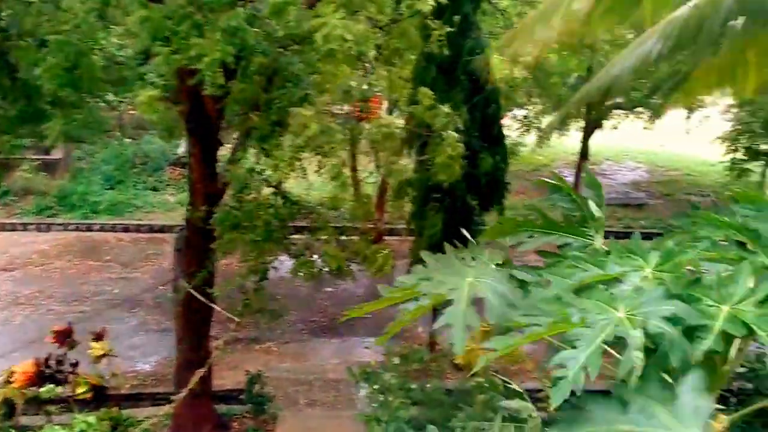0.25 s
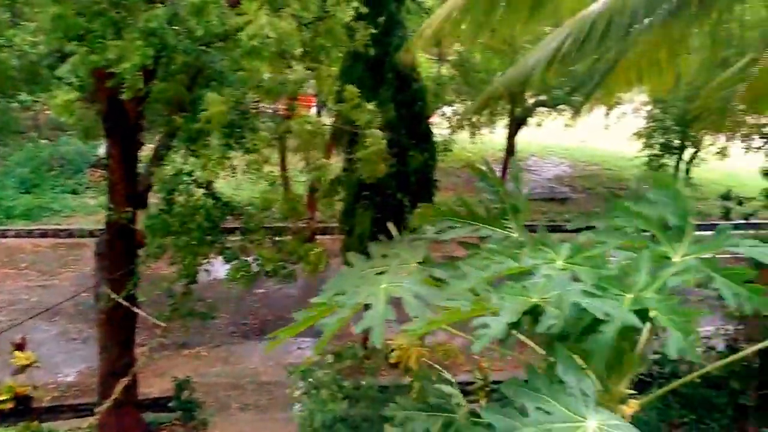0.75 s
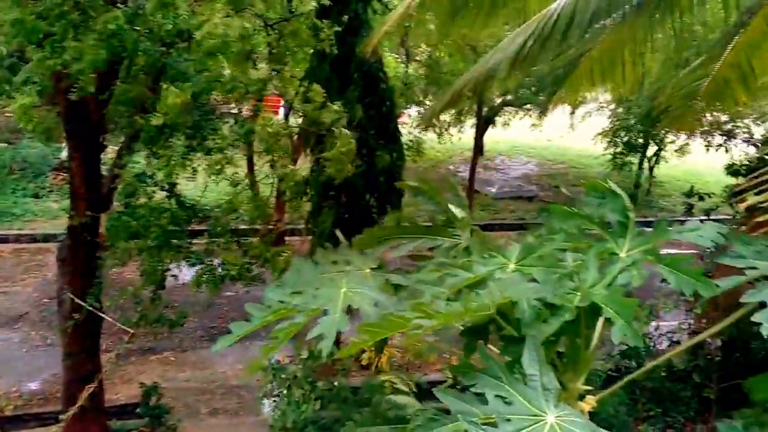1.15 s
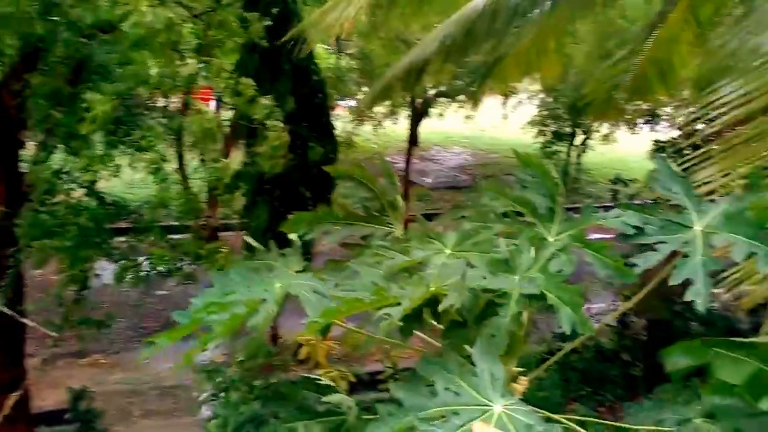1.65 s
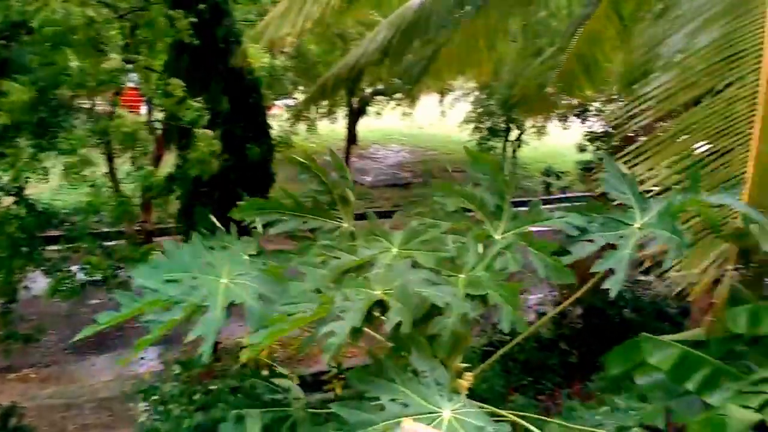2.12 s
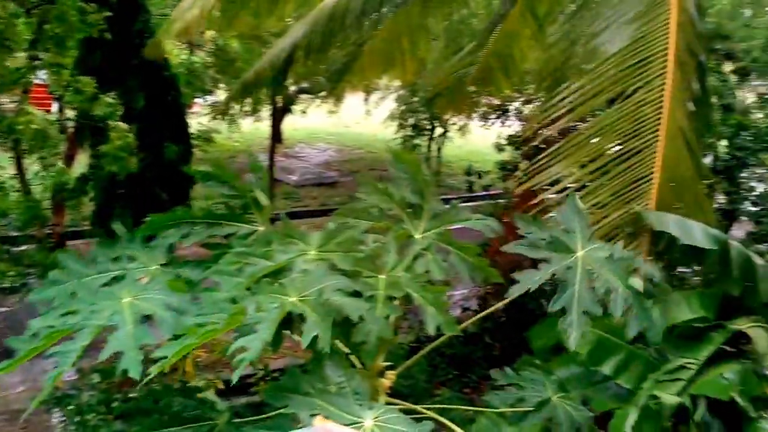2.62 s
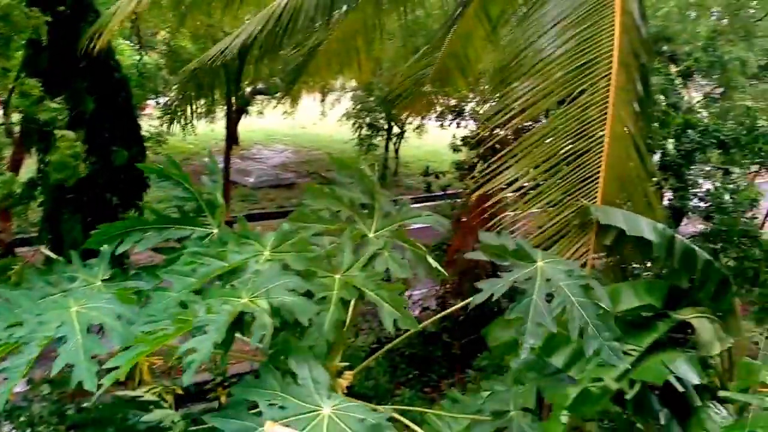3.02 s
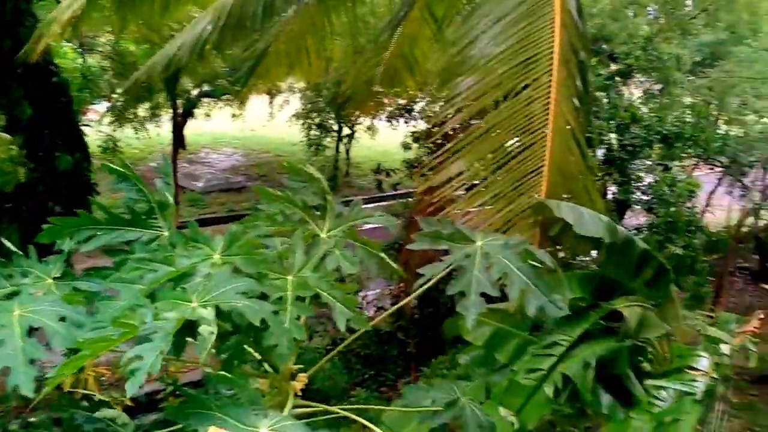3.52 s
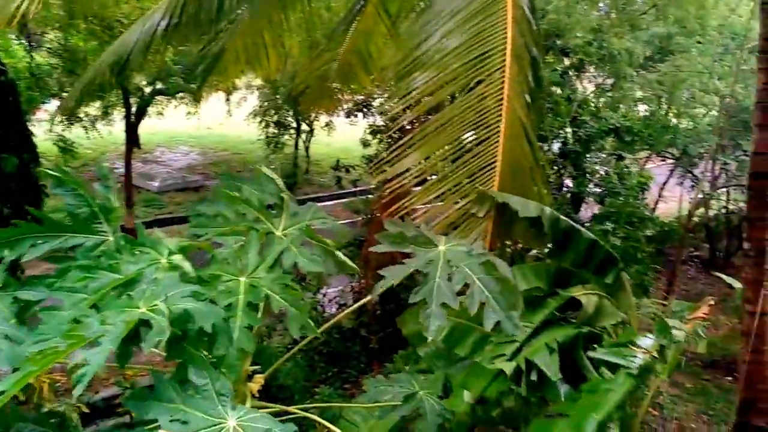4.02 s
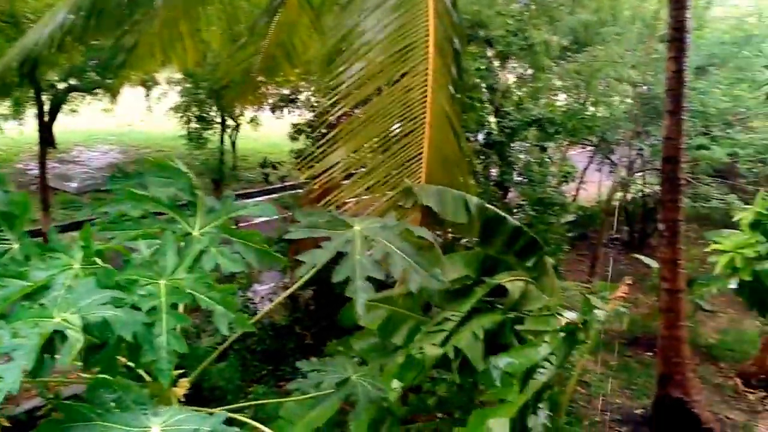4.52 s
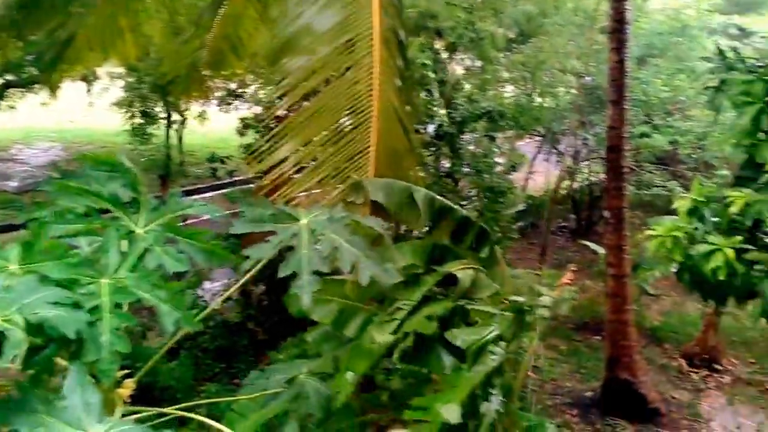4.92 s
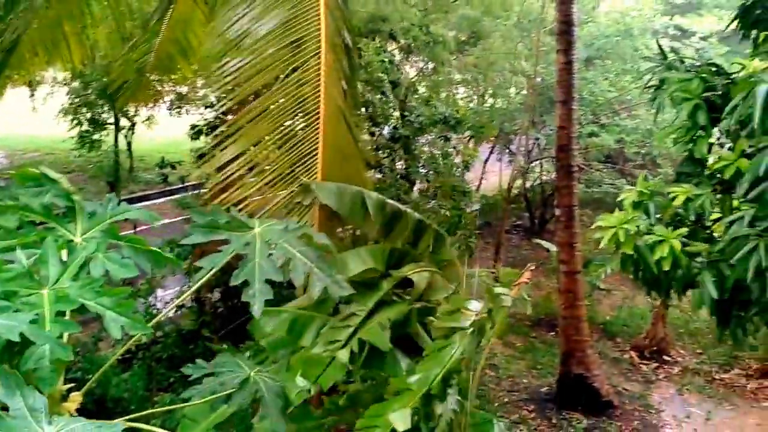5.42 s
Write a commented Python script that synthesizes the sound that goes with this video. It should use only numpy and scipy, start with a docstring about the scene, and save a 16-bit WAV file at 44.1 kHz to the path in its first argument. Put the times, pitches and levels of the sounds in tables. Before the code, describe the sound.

Outdoors in a wet garden, steady dense rain is heard up close in wide stereo. Fat drops plop on near leaves, and a few burst as bright clicks. Low wind buffets the microphone near two seconds and puffs again later, briefly ducking the rain. A low hum joins after three seconds; the downpour is slightly weaker at the end.

```python
"""Heavy rain on a garden, heard up close through a hand-held camera with two microphone ports; about 5.7 s.
It opens on a wash of far drops under the patter on leaves, puddle drips, fine spray and a few sharp ticks.
Near 2 s wind thumps on the ports; from then on the rain swells and eases, and a deep hum rises by 3.3 s.
More puffs come towards the end, as the rain thins. Puffs and ticks trip the limiter: the rain ducks and creeps
back. The stereo is widened by taking a delayed part of each port from the other."""
import sys
import numpy as np
from scipy import signal
from scipy.fft import rfft, irfft
from scipy.io import wavfile
from scipy.ndimage import uniform_filter1d, minimum_filter1d

SR = 44100
rng = np.random.default_rng(int(sys.argv[2]) if len(sys.argv) > 2 else 0)


def persist_wave(psi):
    """Save psi, clipped to +-1, as 16-bit WAV."""
    counts = np.round(np.clip(psi, -1, 1) * 32767).astype(np.int16)
    wavfile.write(sys.argv[1], SR, np.atleast_2d(counts).T)


N = 249606  # length [samples]

# All levels are relative: the mix, the limiter and the filters act on them later.
# Faint deep hum: (time [s], level [dB])
DRONE_LEVEL = [(0, -64), (2.7, -47), (3.3, -35.5), (4.1, -37.5), (4.7, -36), (5.66, -38)]
# Puffs of wind on the ports: (time [s], level [dB], dying time [s])
WIND_PUFFS = [(.03, -28, 0.045), (.14, -30, .16), (1.84, -32, 0.031), (1.95, -16.5, 0.13),
              (2.02, -19.5, 0.23), (2.09, -24.5, .05), (2.34, -18, .087), (2.45, -22, .098),
              (2.56, -21, 0.22), (2.879, -25.5, 0.35), (3.02, -30, 0.052), (3.27, -30, 0.33),
              (3.5, -27, .069), (3.6, -26, 0.086), (4.25, -28, .045), (4.65, -21.5, .073), (4.83, -21, .03),
              (4.92, -31, .04), (5.0, -25, .044)]
# Spectrum of the eddies in the wind: (frequency [Hz], level [dB])
EDDY_SPECTRUM = [(15, -24), (35, -6), (62, 0), (105, -1), (160, -5), (220, -16), (320, -29), (700, -60),
                 (2000, -90)]
# Single eddies that thump against a port: (time [s], level [dB], pitch [Hz])
WIND_BUFFETS = [(0.012, -17, 107), (.150, -24, 106), (1.935, -12, 88), (1.965, -9, 136), (2.002, -8, 101),
                (2.018, -20, 75), (2.041, -11, 111), (2.081, -8.5, 134), (2.124, -11, 100),
                (2.338, -19, 82), (2.379, -20, 69.8), (2.405, -14, 150), (2.442, -8, 105),
                (2.473, -13, 125), (2.501, -12, 120), (2.550, -8, 115), (2.875, -14, 126), (3.494, -21, 79),
                (3.597, -18, 115.5), (3.657, -19, 92.4), (4.653, -14, 115), (4.694, -32, 80),
                (4.825, -13, 110), (5.009, -14.5, 89), (5.139, -29, 140)]
# Course of the whole rain: (time [s], level [dB])
RAIN_LEVEL = [(0, -34.5), (.2, -32), (1.25, -31), (1.8, -31.7), (2.15, -27.5), (2.4, -29), (2.7, -30),
              (3.15, -27.5), (3.36, -26), (3.5, -29.5), (3.68, -32), (3.84, -31), (4.2, -28.5), (4.55, -30),
              (4.9, -34), (5.06, -33), (5.35, -33), (5.66, -33)]
# Far drops on ground and crowns: (frequency [Hz], level [dB])
WASH_SPECTRUM = [(30, 3), (90, -3.5), (145, 9), (200, 0), (330, 0.5), (480, -4.5), (750, -3.5), (1150, -5),
                 (1900, 0), (2450, -2), (3500, -9.5), (4600, -7), (9500, -11.5), (15500, -14)]
# How strongly the leaves sound at each pitch: (pitch [Hz], level [dB])
LEAF_NOTES = [(520, -8), (640, -2), (760, -2.5), (900, -4), (1080, -6), (1250, -1), (1480, 0.5),
              (1700, -2.5), (1880, -4), (2050, 1.5)]
# Flurries of drips on the leaves: (time [s], rise of the patter [dB], half length [s])
LEAF_FLURRIES = [(0.72, 5, 0.016), (0.907, 4, 0.029), (1.16, 3.5, 0.0089), (2.81, 4.5, 0.054),
                 (3.01, 6.5, 0.021), (3.237, 4.5, 0.027), (3.345, 3.5, 0.019), (3.42, 1, 0.022),
                 (3.615, 5, 0.029), (4.36, 2, 0.057), (4.556, 6.5, 0.02), (5.035, 6, 0.024)]
# Fat drops on the big near leaves: (time [s], level [dB], pitch [Hz])
LEAF_PLOPS = [(.984, -17, 1680), (1.104, -10, 1410), (1.283, -12, 1150), (1.424, -12, 1090),
              (2.785, -3, 1750), (3.035, -9, 1020), (3.326, -6, 1270), (3.339, -10, 1250),
              (3.397, -7.5, 1204), (3.421, -8, 1350), (3.578, -10, 1520), (3.609, -8, 1800),
              (3.861, -14, 830), (4.369, -8, 800), (4.546, -6, 1800)]
# Drops bursting on hard things beside the camera:
# (time [s], crack level [dB], ring level [dB], ring pitch [Hz], ring decay [s])
HARD_TICKS = [(.420, -21, -21, 10000, .0004), (.607, -12, -16, 12500, .0005), (.785, -21, -18, 3560, .0007),
              (1.208, -15, -14, 2950, .0008), (1.865, -1.7, -18, 11000, .0004),
              (2.213, 0, -21, 10500, .0004), (2.343, 2, -2.3, 14000, .0005),
              (2.863, -20, -20, 11100, 0.00059), (3.04, -0.5, -17, 9500, .0004),
              (3.199, -25, -14, 9400, .0002), (3.960, 2, -9.5, 6200, 0.00082),
              (5.174, 0.35, -12.5, 6700, 0.00034), (5.263, -20, -20, 6500, .0004),
              (5.39, -20, -17.5, 6000, .0004)]
# Share of each port taken from the other: (frequency [Hz], share [0-1])
CROSSFEED_SHARE = [(100, 0.81), (1200, 0.66), (2450, 0.6), (2800, 0.2), (3350, 0.35), (3670, 0.8),
                   (3950, 0.3), (4300, 0.1), (4850, 0.52), (5400, 0.23), (6100, 0.33), (7000, 0.06),
                   (7600, 0.45), (8100, 0.1), (8600, 0.22), (10000, 0.09), (15000, 0.04)]
# The hollow behind the ports rings near 2 kHz and swallows the band just above: (frequency [Hz], gain [dB])
PORT_HOLLOW = [(1500, -0.16), (1900, 0.74), (2150, 0.9), (2450, -4.5), (2800, -0.05), (3350, 1.1),
               (3700, -1), (4200, 1), (4800, -1.4), (5400, -0.3), (11500, 0.3), (12300, 2)]
# Colour of the left channel, mostly weaker and duller than the right: (frequency [Hz], gain [dB])
LEFT_COLOUR = [(60, -2.5), (250, -2), (480, -4), (800, -2), (1200, -0.83), (3500, -0.15), (6500, 0.4),
               (8400, 2.5), (10000, 1.5), (11500, -2.5), (13000, -6.5), (14000, -12), (15000, -24)]

PORT_LAG = 18  # longest delay between the ports [samples]


def gain_of(db):
    """Turns decibels into an amplitude factor."""
    return 10 ** (np.asarray(db) / 20)


def evened(x):
    """Scales to rms 1."""
    return x / np.sqrt(np.mean(x ** 2) + 1e-20)


def read(points, hz):
    """Reads a spectrum table along a log-frequency axis."""
    table_hz, value = np.transpose(points)
    return np.interp(np.log(hz + 1), np.log(table_hz + 1), value)


def follow(points):
    """Turns a (time, level) table into a gain for every sample."""
    time_s, level_db = np.transpose(points)
    return gain_of(np.interp(np.arange(N) / SR, time_s, level_db))


def coloured(x, points):
    """Filters by a spectrum table."""
    gain = gain_of(read(points, np.fft.rfftfreq(N, 1 / SR)))
    return irfft(rfft(x) * gain, N)


def add(mix, s, sound):
    """Adds a sound to every row of the mix at time s, cut at the end."""
    part = mix[:, round(s * SR):][:, :len(sound)]
    part += sound[:part.shape[1]]


def swell(s, rise_s, fall_s):
    """A smooth hump of height 1 at time s."""
    t = np.arange(N) / SR - s
    width_s = np.where(t < 0, rise_s, fall_s)
    return np.exp(-np.minimum((t / width_s) ** 2, 20))


def ring(hz, decay_s, size=900):
    """A struck wet surface: a sine that decays exponentially within a few cycles."""
    t = np.arange(size) / SR
    return np.sin(2 * np.pi * hz * t) * np.exp(-t / decay_s)


def impacts(per_s, spread_db, arc, largest=12.0):
    """Random drops of uneven size; each one's direction within an arc [rad] in front sets its port lag."""
    chance = rng.random(N)
    size = np.minimum(rng.exponential(1, N), largest)
    angle = arc * rng.uniform(-1, 1, N)
    strength = gain_of(spread_db * size) * rng.choice([-1, 1], N)
    at = np.flatnonzero(chance < per_s / SR)
    lag = np.round(PORT_LAG * np.sin(angle[at])).astype(int)
    return np.array([np.bincount(i, strength[at], N) for i in (at, (at + lag) % N)])


def struck(hits, note):
    """Lets every impact at both ports sound the same note."""
    return signal.oaconvolve(hits, note[None])[:, :N]


def drone(pitch_hz=41, waver_hz=1.54, octave_db=-7, left_db=-9):
    """A deep hum with a weaker octave; it wavers in pitch and is stronger at the right port."""
    waver = evened(uniform_filter1d(rng.standard_normal(N), size=4000))
    phase = 2 * np.pi * np.cumsum(pitch_hz + waver_hz * waver) / SR
    hum = evened(np.sin(phase) + gain_of(octave_db) * np.sin(2 * phase))
    return follow(DRONE_LEVEL) * np.array([gain_of(left_db) * hum, hum])


def wind(level_db=-7, opposed=0.43, push_db=15.0, bluster_db=-1, bluster_pitch=1.7,
         rise_s=0.032, breeze_db=-45.5):
    """Puffs push slowly on both ports and carry eddies that press on one port and partly suck at the other.
    Strong puffs also shed smaller, higher eddies, which grow with the square of the force."""
    puffs = sum((gain_of(db) * swell(s, rise_s, fall_s)) ** 2 for s, db, fall_s in WIND_PUFFS)
    force = np.sqrt(gain_of(breeze_db) ** 2 + puffs)
    eddies = coloured(rng.standard_normal((2, N)), EDDY_SPECTRUM)
    large = evened(eddies - opposed * eddies[::-1])
    higher_spectrum = [(hz * bluster_pitch, db) for hz, db in EDDY_SPECTRUM]
    small = evened(coloured(rng.standard_normal((2, N)), higher_spectrum))
    pressure = gain_of(push_db) + gain_of(level_db) * large + gain_of(bluster_db) * force * small
    return force * pressure


def buffets(level_db=-2, cycles=0.57, opposed=0.5):
    """An eddy hits the right port with a dull thump of a cycle or two and sucks at the left."""
    thumps, t = np.zeros(N), np.arange(N) / SR
    for (s, db, hz), turn in zip(WIND_BUFFETS, rng.random(len(WIND_BUFFETS))):
        half_s = cycles / hz
        wave = np.cos(2 * np.pi * (hz * (t - s) + turn))
        thumps += gain_of(db + level_db) * swell(s, half_s, half_s) * wave
    return np.array([-opposed * thumps, thumps])


def wash(patchy_db=3.5, patchy_hz=900, even_hz=9000, flicker_db=0.1, width=0.91, size=1024):
    """Far rain from all sides: noise in drifting patches that even out in the bass and the treble."""
    hop = size // 4
    frames, hz = N // hop + 5, np.fft.rfftfreq(size, 1 / SR)
    a, b, c, d, patches = rng.standard_normal((5, frames, len(hz)))
    patches = uniform_filter1d(patches, size=10, axis=0)  # drifts in time
    patches = evened(uniform_filter1d(patches, size=4, axis=1))  # spans neighbouring bands
    depth_db = patchy_db * hz ** 2 / (hz ** 2 + patchy_hz ** 2) / (1 + hz / even_hz)
    flicker = evened(uniform_filter1d(rng.standard_normal((frames, 1)), size=8, axis=0))
    # Sound from all sides is alike at both ports only for long waves.
    same = np.sinc(2 * hz * width * PORT_LAG / SR)
    left = a + 1j * b
    right = same * left + np.sqrt(1 - same ** 2) * (c + 1j * d)
    level_db = read(WASH_SPECTRUM, hz) + depth_db * patches + flicker_db * flicker
    spectrum = np.array([left, right]) * gain_of(level_db)
    _, noise = signal.istft(spectrum, nperseg=size, noverlap=size - hop, time_axis=-2, freq_axis=-1)
    return evened(noise[:, :N])


def puddles(per_s=45, low_hz=600, high_hz=5000, cycles=16, glide=0.0199, spread_db=2.5, tilt_db=-4, arc=0.95):
    """Drips trap bubbles that ring at slightly rising pitches, higher ones fainter by tilt_db an octave."""
    out = np.zeros((2, N))
    for when, pitch, size, side in rng.random((round(per_s * N / SR), 4)):
        hz = low_hz * (high_hz / low_hz) ** pitch
        age = np.arange(0, 2 * np.pi, hz / (cycles * SR))  # in decay times
        note = np.sin(2 * np.pi * cycles * age * (1 + glide * age)) * np.exp(-age)
        note *= gain_of(tilt_db * np.log2(hz / low_hz) - spread_db * np.log(size + 0.039))
        s = when * N / SR
        lag_s = PORT_LAG * np.sin(arc * (2 * side - 1)) / SR
        add(out[:1], s, note)
        add(out[1:], abs(s + lag_s), note)
    return evened(out)


def spray(per_s=110, spread_db=-1.5, cycles=2.0, arc=1.1, low_hz=3000, high_hz=13500):
    """Fine splashes crackle in the treble as very short rings at twelve pitches."""
    pitches = np.geomspace(low_hz, high_hz, num=12)
    return evened(sum(struck(impacts(per_s, spread_db, arc), ring(hz, cycles / hz)) for hz in pitches))


def patter(per_s=220, spread_db=1.22, cycles=1.49, arc=0.77):
    """Drops slap leaves of many sizes, each leaf answering with a short dull note."""
    out = np.zeros((2, N))
    for hz, db in LEAF_NOTES:
        note = struck(impacts(per_s, spread_db, arc), ring(hz, cycles / hz))
        out += gain_of(db) * evened(note)
    return evened(out)


def plops(cycles=1.2, level_db=-3):
    """Fat drops make big near leaves ring for a cycle or two, alike at both ports."""
    out = np.zeros((2, N))
    for s, db, hz in LEAF_PLOPS:
        add(out, s, gain_of(db + level_db) * ring(hz, cycles / hz))
    return out


def ticks(level_db=-1, crack_hz=19000, snap=0.29, snap_s=0.00025, splash=0.05, splash_s=0.008):
    """Drops burst close by: a needle-sharp crack, then a ring with a bright snap and a short splash."""
    out = np.zeros((2, N))
    crack = np.hanning(21) * np.cos(2 * np.pi * crack_hz * np.arange(-10, 11) / SR)
    for s, crack_db, ring_db, hz, decay_s in HARD_TICKS:
        note = ring(hz, decay_s)
        t = np.arange(len(note)) / SR
        fizz = evened(np.diff(rng.standard_normal(len(note) + 1)))  # noise tilted to the treble
        burst = fizz * (snap * np.exp(-t / snap_s) + splash * np.exp(-t / splash_s))
        tail = gain_of(ring_db + level_db) * (note + burst)
        add(out, s, np.concatenate([gain_of(crack_db) * crack, tail]))
    return out


def scene(wash_db=8.0, patter_db=1.5, spray_db=-8, puddles_db=-9, unevenness_db=-0.03):
    """Rain and wind as they reach the two ports; the patter rises in short flurries of drips."""
    flurry_db = sum(db * swell(s, half_s, half_s) for s, db, half_s in LEAF_FLURRIES)
    # A random unevenness far too slight to hear.
    unevenness = uniform_filter1d(rng.standard_normal(N), size=2000)
    unevenness = evened(uniform_filter1d(unevenness, size=600))
    rain = gain_of(wash_db) * wash() + gain_of(puddles_db) * puddles() + gain_of(spray_db) * spray()
    rain += gain_of(patter_db + flurry_db + unevenness_db * unevenness) * patter()
    return drone() + wind() + buffets() + follow(RAIN_LEVEL) * rain + plops() + ticks()


def limited(x, ceiling_db=-4.0, attack_s=0.0083, recover_db_per_s=8.5, size=4001):
    """A peak over the ceiling turns the gain down quickly; it holds for size samples, then creeps back."""
    over_db = np.maximum(20 * np.log10(abs(x).max(0) + 1e-9) - ceiling_db, 0)
    held_db = minimum_filter1d(-over_db, size=size, origin=size // 2, mode="constant")
    climb_db = recover_db_per_s * np.arange(N) / SR
    wanted_db = np.minimum.accumulate(held_db - climb_db) + climb_db
    keep = np.exp(-1 / (attack_s * SR))
    return x * gain_of(signal.lfilter([1 - keep], [1, -keep], wanted_db))


def widened(ports, hz):
    """Takes a delayed share of each port from the other: combs the sound, turns wind to opposite phase."""
    share = np.clip(read(CROSSFEED_SHARE, hz), 0, 1)
    delay = np.exp(-2j * np.pi * hz * PORT_LAG / SR)
    return ports - share * delay * ports[::-1]


def record(dry, shade_db=-5, shade_hz=3500, edge_hz=15650):
    """Limiter, rumble filter, stereo widening, port and channel colour, then the upper band limit."""
    rumble_filter = signal.butter(4, 24, "high", fs=SR, output="sos")
    hz = np.fft.rfftfreq(N, 1 / SR)
    ports = rfft(signal.sosfilt(rumble_filter, limited(dry)))
    # The body shades the left port from short waves.
    ports[0] *= gain_of(shade_db * hz ** 2 / (hz ** 2 + shade_hz ** 2))
    left, right = irfft(widened(ports, hz) * gain_of(read(PORT_HOLLOW, hz)), N)
    stereo = np.array([coloured(left, LEFT_COLOUR), right])
    low_pass = signal.firwin(511, edge_hz, window=("kaiser", 9), fs=SR)
    return signal.oaconvolve(stereo, low_pass[None], "same")


dry = scene()
out = record(dry)
persist_wave(out)
```